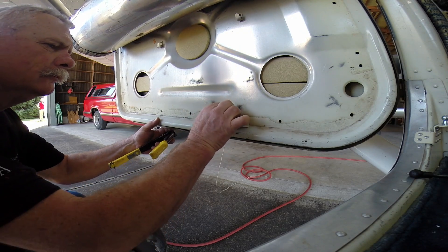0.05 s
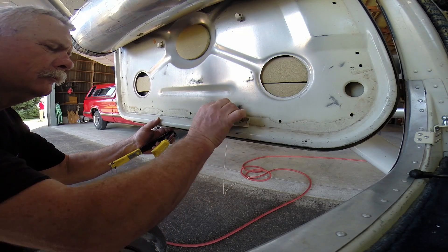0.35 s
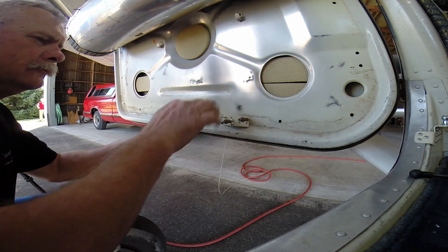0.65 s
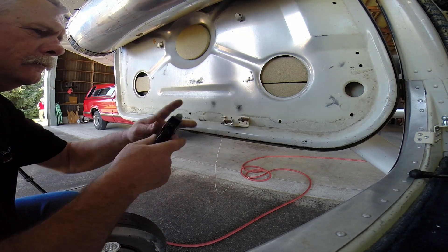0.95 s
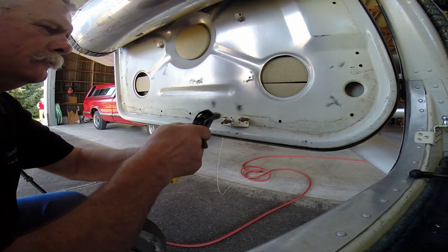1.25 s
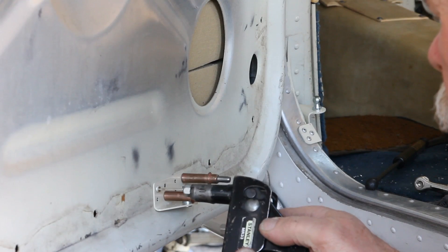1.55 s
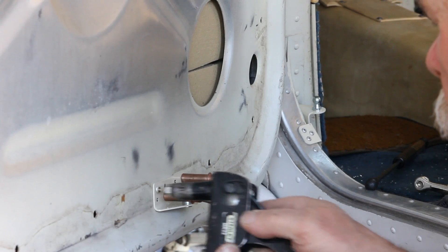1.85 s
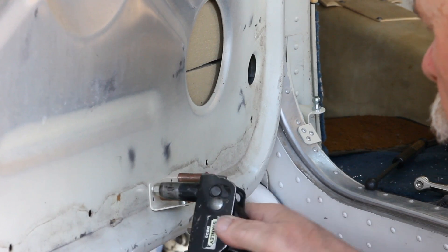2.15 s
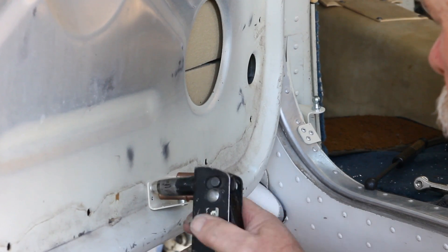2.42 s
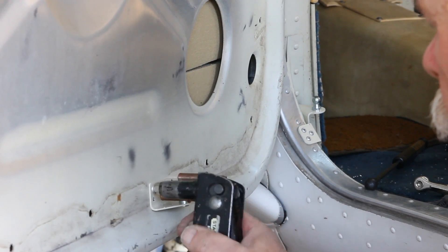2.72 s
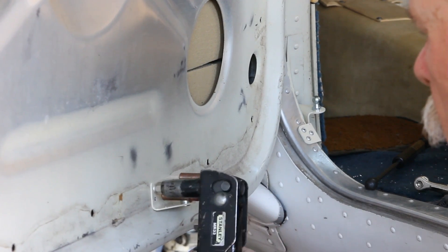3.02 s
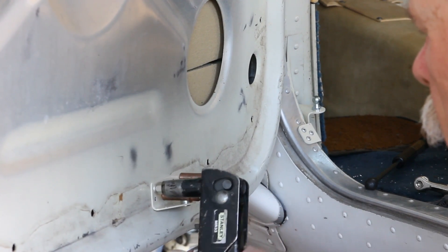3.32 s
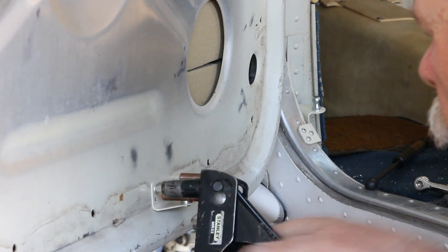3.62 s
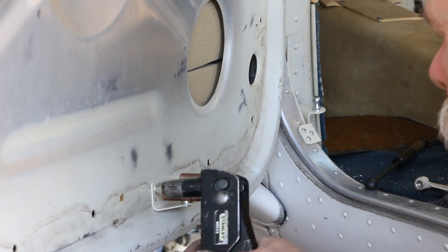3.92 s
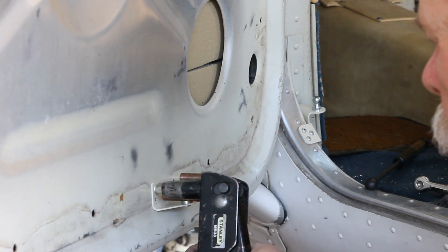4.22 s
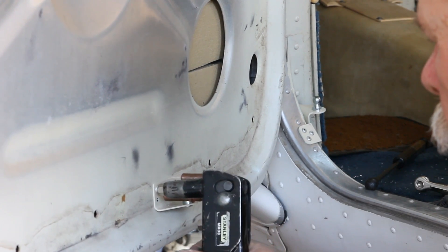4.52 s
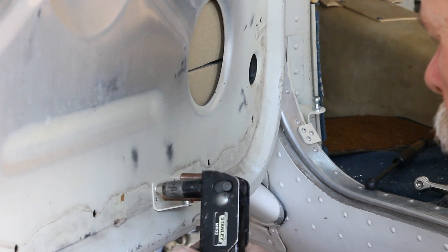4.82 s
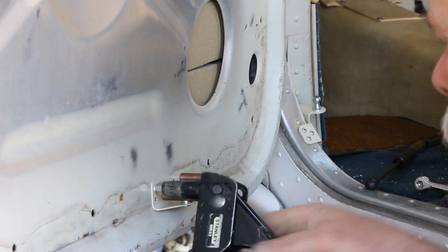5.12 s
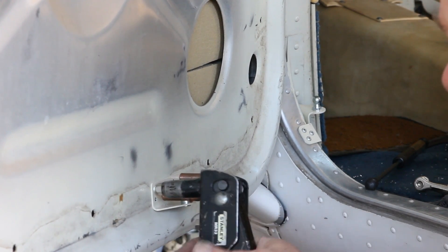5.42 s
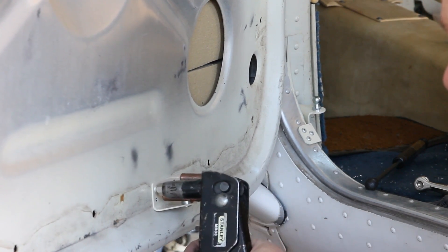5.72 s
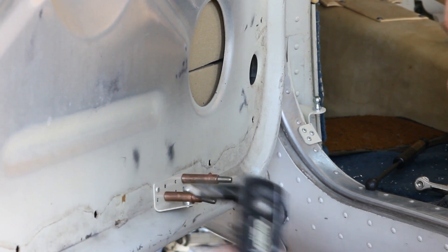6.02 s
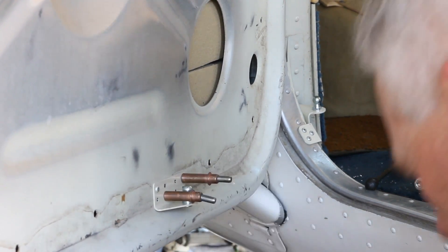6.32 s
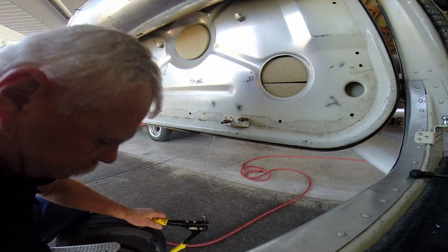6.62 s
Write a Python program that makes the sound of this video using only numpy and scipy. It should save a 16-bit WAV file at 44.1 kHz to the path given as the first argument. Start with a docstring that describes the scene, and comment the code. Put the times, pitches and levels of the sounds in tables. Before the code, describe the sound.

Close up in a quiet garage, a hand riveter taps, scrapes and clunks on a thin, briefly ringing aluminium panel while small steel parts tick. Past the middle the tool snaps with a bang. More knocks lead to a second, harder bang near the end, slightly distorted, followed by a cluster of light metallic clicks and low buffeting on the microphone.

```python
"""Close knocks, clicks and scrapes on a thin aluminium door panel: a hand riveter at work in a garage.
Twice it lets go with a bang, the second hard enough to overload the microphone. Blows are bands of noise
dying away in the sheet over its ringing low modes; sliding metal hisses, catches and squeaks, and small
steel parts tick. Faint whines hang in the air, and a low buffeting rises towards the end."""
import sys
import numpy as np
from scipy import signal
from scipy.io import wavfile

SR = 44100
rng = np.random.default_rng(int(sys.argv[2]) if len(sys.argv) > 2 else 0)


def generate_wav(signal):
    """Clip the signal to [-1, 1] and save it as 16-bit WAV at the path in sys.argv[1]."""
    frames = np.transpose(np.atleast_2d(signal))
    scaled = np.clip(frames, -1, 1) * 32767
    pcm = np.round(scaled).astype(np.int16)
    wavfile.write(sys.argv[1], SR, pcm)


N = 297675
TIME = np.arange(N) / SR
EDGES = np.geomspace(24, 17000, 21)   # half-octave bands, Hz
CENTRES = np.sqrt(EDGES[1:] * EDGES[:-1])

# The riveter lets go. Each row: start in seconds, then level, thump and brightness in relative dB.
BANGS = [(4.5293, -11, -10.5, -2.5), (5.9415, -2, -15.5, -3.5)]
# The tool hits the panel. Each row: start in seconds, then level, thump and brightness in relative dB.
KNOCKS = [(0.085, -45.5, 1, -22), (0.2948, -23, -4, -10), (0.708, -44, -23, -6.5), (1.718, -34, -14, -11),
          (1.804, -31.5, -5.5, -7.5), (2.0163, -20.5, -8.5, -9), (2.055, -38, -5, -0.5),
          (2.201, -39.5, -13, -16), (2.23, -39, -7, -2.5), (2.461, -42.5, -8, -2.5), (2.659, -46, -3, -56),
          (3.027, -34.5, -8, -12.5), (3.228, -36, -20, -15.5), (3.534, -19, -20.5, -6.5),
          (3.574, -13.5, -10.5, -7.5), (3.886, -38, 3.5, -1.5), (3.979, -40, -12, -18.5),
          (4.088, -54, -4, -31), (4.209, -52.5, -5, -38), (4.526, -22.5, -7.5, -20), (5.006, -44, -14, -16),
          (5.072, -34.5, -5.5, 2.5), (5.099, -18.5, -15.5, -7.5), (5.172, -22.5, 0.5, -7.5),
          (5.181, -12.5, -25.5, -6.5), (5.453, -38.5, 2, -7), (5.551, -41.5, -7, -16)]
# Tool and hand slide on metal. Each row: start and end in seconds, level and brightness in relative dB.
RUBS = [(0.405, 0.67, -51, -15.5), (0.899, 1.24, -62, -3.5), (1.481, 1.501, -41.5, -37),
        (1.89, 1.948, -47, -13.5), (1.956, 2.0, -32, -26), (2.004, 2.012, -23.5, -16),
        (2.084, 2.61, -53, -19.5), (2.87, 3.48, -56.5, -18.5), (3.489, 3.634, -30, -14),
        (3.763, 3.872, -39.5, -24), (3.875, 3.924, -39.5, -6), (4.96, 5.05, -48, -18),
        (5.079, 5.149, -27.5, -14.5), (5.375, 5.504, -40.5, -22), (6.17, 6.649, -75, 13.5),
        (6.346, 6.365, -48, 0.5)]
# Modes of the small steel parts. Each row: pitch in Hz, weight in dB.
STEEL_MODES = [(1570, 13.5), (1920, 7.5), (2360, -2.5), (2750, -6), (3580, -8.5), (4190, -7), (5000, -1.5),
               (5800, -4.5), (6650, 2), (7450, 0), (8150, -3), (9560, 0.5), (10400, 1), (11800, 0.5),
               (14100, 2)]


def from_db(db):
    """Decibels to amplitude."""
    return 10 ** (np.asarray(db) / 20)


def rms_one(x):
    """Scales a signal to an rms of 1."""
    return x / np.sqrt(np.mean(x ** 2) + 1e-20)


def at_bands(points):
    """Reads a curve of (Hz, value) points at the band centres, on a log-frequency axis."""
    hz, values = np.transpose(points)
    return np.interp(np.log(CENTRES), np.log(hz), values)


def envelope(start, end, attack_s, release_s):
    """Rises to 1 at the start, holds to the end, then falls away."""
    return np.interp(TIME, [start - attack_s, start, end, end + release_s], [0, 1, 1, 0])


def flutter(rate):
    """A wobble of rms 1 through `rate` random points a second."""
    return rms_one(np.interp(TIME * rate, np.arange(N // 8), rng.standard_normal(N // 8)))


def resonate(x, hz, width_hz):
    """One resonance, gain 1 at its peak."""
    r = np.exp(-np.pi * width_hz / SR)
    poles = [1, -2 * r * np.cos(2 * np.pi * hz / SR), r * r]
    return signal.lfilter(np.array([1, 0, -1]) * (1 - r * r) / 2, poles, x + 1e-18)


def noise_bands():
    """Unrelated half-octave noises of rms 1: the crowd of modes too dense to tell apart."""
    filters = [signal.butter(2, edge, "band", fs=SR, output="sos") for edge in zip(EDGES, EDGES[1:])]
    return np.array([rms_one(signal.sosfilt(sos, rng.standard_normal(N))) for sos in filters])


def band_gains(spectrum):
    """Band amplitudes of a spectrum, with total power 1."""
    gains = from_db(at_bands(spectrum)) * np.sqrt(np.diff(EDGES))
    return gains / np.linalg.norm(gains)


def garage_air(bands, air_db=-59, fade_s=0.12, rest_db=-14):
    """Quiet room tone with faint high whines that swell and recede."""
    # The room tone's colour. Each row: frequency in Hz, density in relative dB.
    air = [(15, -49), (25, -32.5), (97, 6), (277, -4.5), (326, -10), (476, 3.5), (531, -11.5),
           (2050, -25.5), (2350, -27.5), (5000, -32.5), (6920, -32.5), (10700, -32.5), (16000, -32.5)]
    # Narrow bands of whining noise. Each row: pitch in Hz, width in Hz, full level in dB.
    whines = [(2060, 200, -87), (5800, 280, -82), (10760, 410, -78.5)]
    # When the whines are up. Each row: start and end in seconds.
    spells = [(0, 0.33), (2.38, 2.63), (3.75, 4.5), (5.98, 7.3)]
    whine = sum(from_db(db) * rms_one(resonate(resonate(rng.standard_normal(N), hz, width), hz, width))
                for hz, width, db in whines)
    swell = sum(envelope(start, end, fade_s, fade_s) for start, end in spells)
    return from_db(air_db) * (band_gains(air) @ bands) + whine * np.maximum(swell, from_db(rest_db))


def buffeting(bands, attack_s=0.03, release_s=0.025):
    """Lumpy low rumble at the microphone, in overlapping gusts."""
    # The gusts. Each row: start and end in seconds, level in relative dB.
    gusts = [(0.842, 0.851, -48.5), (4.766, 5.039, -54.5), (5.368, 6.729, -45.5), (5.702, 5.739, -34),
             (5.803, 5.839, -37), (5.941, 5.995, -38), (6.257, 6.326, -30), (6.386, 6.394, -33.5),
             (6.432, 6.499, -33.5)]
    power = sum((from_db(db) * envelope(start, end, attack_s, release_s)) ** 2
                for start, end, db in gusts)
    colour = band_gains([(25, -36.5), (55, -12.5), (90, 7), (140, 0.5), (220, -4.5), (400, -16.5),
                         (800, -31), (2000, -55), (16000, -62)])
    return np.sqrt(power) * (colour @ bands)


def tings(shimmer_per_s=130, rise_s=0.025):
    """A thin piece of steel shimmers on faintly after a jolt."""
    # The jolts. Each row: start in seconds, level in relative dB.
    jolts = [(5.945, -51.5), (6.615, -65)]
    # The piece's modes. Each row: pitch in Hz, weight in dB, t60 in seconds.
    modes = [(3230, -2.5, 1), (4500, -5, 0.52)]
    out = np.zeros(N)
    ring = sum(from_db(db - 60 * TIME / t60) * flutter(shimmer_per_s) * np.sin(2 * np.pi * hz * TIME)
               for hz, db, t60 in modes)
    ring *= 1 - np.exp(-TIME / rise_s)
    for s, db in jolts:
        i = int(s * SR)
        out[i:] += from_db(db) * ring[:N - i]
    return out


def squeaks(waver, rough_db, overtone_db):
    """A dry joint sings briefly and roughly, sliding in pitch."""
    # The squeaks. Each row: start and length in seconds, first and last pitch in Hz, level in relative dB.
    glides = [(0.405, 0.15, 2065, 2000, -68.5), (0.931, 0.074, 1660, 1545, -62),
              (1.085, 0.019, 1350, 1280, -54), (1.955, 0.082, 1880, 1803, -42.5),
              (3.685, 0.04, 1690, 1980, -42.5), (6.43, 0.018, 1420, 1630, -42.5)]
    out, wobble = np.zeros(N), 1 + waver * flutter(600)
    for start, length, start_hz, end_hz, db in glides:
        i, n = int(start * SR), int(length * SR)
        phase = 2 * np.pi * np.cumsum(np.linspace(start_hz, end_hz, n) * wobble[i:i + n]) / SR
        tone = np.sin(phase) + from_db(overtone_db) * np.sin(2 * phase)
        out[i:i + n] += from_db(db) * np.sin(np.linspace(0, np.pi, n)) * tone
    return out * rms_one(from_db(rough_db * flutter(450)))


def grit(per_s, spread_db, width_hz):
    """While metal slides, tiny catches tick at random in the steel's modes."""
    level = np.zeros(N)
    for start, end, db, bright_db in RUBS:
        level[int(start * SR):int(end * SR)] = from_db(db + bright_db / 2)
    catches = level * (rng.random(N) < per_s / SR)
    catches *= from_db(spread_db * np.minimum(rng.exponential(1, N), 2))
    rings = sum(from_db(db) * resonate(catches * (2 * rng.random(N) - 1), hz, width_hz)
                for hz, db in STEEL_MODES)
    return rings * SR / (np.pi * width_hz)   # makes up the height an impulse loses in a narrow resonance


def clink(centre_hz, t60, t, scatter_db=5, detune=0.05):
    """One touch of steel: the modes near its pitch ring, each grip tuning and weighting them anew."""
    hz, db = np.transpose(STEEL_MODES)
    strength, shift = rng.standard_normal((2, len(hz)))
    nearness = np.exp(-0.5 * np.log2(hz / centre_hz) ** 2)
    weights = from_db(db + scatter_db * strength) * nearness * rng.choice([-1, 1], len(hz))
    rings = np.sin(2 * np.pi * (hz * (1 + detune * shift))[:, None] * t)
    return weights / np.linalg.norm(weights) @ rings * from_db(-60 * t / t60)


def loose_ticks(per_s=12, centre_hz=5260, octaves=0.65, spread_db=5):
    """Loose parts touch at random while the tool is handled: extra rows for ticks()."""
    # Spells of handling. Each row: start and end in seconds, level in relative dB.
    handling = [(0.903, 1.228, -50), (2.304, 3.457, -64), (4.927, 5.49, -46.5), (6.196, 6.57, -61)]
    return [(rng.uniform(start, end), db + spread_db * rng.standard_normal(),
             centre_hz * 2 ** (octaves * rng.standard_normal()))
            for start, end, db in handling for _ in range(int(per_s * (end - start)))]


def ticks(bands, t60, ring_t60, octaves, modes_db, bounce_db, body_db):
    """Light steel contacts: a crack, a clink at the part's own pitch, and one quick bounce."""
    # Small parts touching. Each row: start in seconds, level in relative dB, centre pitch in Hz.
    contacts = [(0.949, -52.5, 3700), (0.977, -35.5, 4460), (0.991, -43, 3280), (1.076, -55, 3300),
                (1.122, -53, 3500), (1.171, -42, 2740), (2.346, -40, 4040), (2.495, -40.5, 3950),
                (2.545, -48, 11500), (2.773, -55, 1900), (2.885, -49.5, 6030), (2.986, -41.5, 5770),
                (3.1131, -40.5, 7740), (3.146, -52, 7040), (3.477, -33.5, 6350), (3.489, -45, 6000),
                (3.501, -41, 7500), (3.776, -44, 3000), (3.803, -38, 5960), (3.823, -34, 5600),
                (3.890, -37, 6070), (4.579, -32.5, 8000), (4.766, -44.5, 7100), (5.041, -43, 5940),
                (5.064, -40.5, 5140), (5.139, -33, 5500), (5.214, -38, 7900), (5.351, -53, 6500),
                (5.371, -37, 4960), (5.379, -26, 5370), (5.392, -43, 8500), (5.428, -48, 5900),
                (5.468, -43, 8000), (5.483, -36.5, 7700), (6.139, -35, 6240), (6.209, -26.5, 6900),
                (6.222, -35, 7500), (6.2315, -25.5, 7800), (6.243, -34, 7300), (6.319, -32, 7700),
                (6.355, -33, 5300), (6.368, -30.5, 6700), (6.379, -26.5, 8500), (6.4893, -40.5, 7650),
                (6.631, -50, 8600)]
    out, t = np.zeros(N), TIME[:SR // 10]
    snap = from_db(-60 * t / t60) * (1 - np.exp(-t / 0.00083))
    for s, db, hz in contacts + loose_ticks():
        colour = np.exp(-0.5 * (np.log2(CENTRES / hz) / octaves) ** 2)
        colour += from_db(body_db) * (CENTRES > 350)
        for delay, touch_db in [(0, 0), (rng.uniform(0.0028, 0.007), bounce_db)]:
            i = int((s + delay) * SR)
            crack = snap * (colour / np.linalg.norm(colour) @ bands[:, i:i + len(t)])
            ring = from_db(modes_db) * clink(hz, ring_t60, t)
            out[i:i + len(t)] += from_db(db + touch_db) * (crack + ring)
    return out


def contact_colour(thump_db, bright_db):
    """Band gains of a contact with the panel: a heavy one adds bass, a hard one treble."""
    # The basic colour of a blow. Each row: frequency in Hz, density in relative dB.
    spectrum = [(30, -12), (70, 1), (130, 5.5), (220, 3), (330, 4), (500, 7), (900, 0), (1500, -7.5),
                (2500, -7), (3800, -7), (5800, -2.5), (9000, -7.5), (15500, -13.5)]
    tilt = [(35, -6.5), (90, thump_db + 6.5), (200, thump_db + 5.5), (420, 0), (1500, -0.5),
            (4200, bright_db + 0.5)]
    return band_gains(spectrum) * from_db(at_bands(tilt))


def rubs(bands, edge_s, thump_db, slip_db, grit_db):
    """Sliding metal sticks and slips, so each stroke is an uneven, gritty hiss."""
    out = np.zeros(N)
    for start, end, db, bright_db in RUBS:
        i, j = int((start - edge_s) * SR), int((end + 2 * edge_s) * SR)
        stroke = envelope(start, end, edge_s, 2 * edge_s)[i:j]
        out[i:j] += from_db(db) * stroke * (contact_colour(thump_db, bright_db) @ bands[:, i:j])
    return out * rms_one(from_db(slip_db * flutter(55) + grit_db * flutter(700)))


def lever(scrape):
    """A scrape picks up the ring of the riveter's steel lever."""
    # The lever's resonances. Each row: pitch in Hz, width in Hz, gain in dB.
    modes = [(1784, 44, 6), (2820, 130, 3), (4400, 480, 2.5)]
    return scrape + sum(from_db(db) * resonate(scrape, hz, width) for hz, width, db in modes)


def tool_ring(centre_hz, t60):
    """The riveter's own steel rings with every knock, the more the harder the contact."""
    out, t = np.zeros(N), TIME[:SR // 5]
    for s, db, thump_db, bright_db in KNOCKS:
        i = int(s * SR)
        out[i:i + len(t)] += from_db(db + bright_db) * clink(centre_hz, t60, t)
    return out


def pressed():
    """1 while the tool is squeezed hard against the panel, fading to 0 either side."""
    # The squeezes. Each row: start and end in seconds.
    squeezes = [(1.96, 2.07), (3.49, 3.76), (4.52, 4.73), (5.08, 5.24)]
    return sum(envelope(start, end, 0.01, 0.01) for start, end in squeezes)


def panel(contacts, engaged_s=1.6, unloaded_db=-8.5, shifts_per_s=6, shift_db=2):
    """The sheet's modes ring out more once the riveter bears on it; a hard squeeze tames the strongest."""
    # The sheet's resonances. Each row: pitch in Hz, width in Hz, nominal gain in dB.
    modes = [(254, 22, -7), (383, 20, -2), (483, 22, 10.5), (555, 18, -2), (719, 20, -7), (776, 22, 2.5),
             (929, 20, -6), (1006, 30, -2), (1124, 34, -6), (1290, 40, 0), (1600, 40, -2), (1835, 32, -2),
             (1941, 30, -5), (5310, 55, -2), (8560, 55, -2)]
    drive = contacts * np.where(TIME < engaged_s, from_db(unloaded_db), 1)
    ring, held = np.zeros(N), pressed()
    for hz, width, db in modes:
        drift_db = shift_db * flutter(shifts_per_s)   # the point of contact shifts
        ring += resonate(drive * from_db(db - held * max(0, db) + drift_db), hz, width)
    return contacts + ring


def body_ring(hits, modes, per_thump=0.27, rise_s=0.0016, detune=0.0095):
    """Blows set the body's modes swinging, retuned by each grip; dull ones barely reach the high modes."""
    out, t = np.zeros(N), TIME[:SR // 3]
    hz, mode_db, t60 = np.transpose(modes)[:, :, None]
    attack = 1 - np.exp(-t / rise_s)
    for s, db, thump_db, bright_db in hits:
        i, shift = int(s * SR), 1 + detune * rng.standard_normal(hz.shape)
        decay = from_db(mode_db + bright_db * (hz > 4000) - 60 * t / t60)
        rings = rng.choice([-1, 1], hz.shape) * decay * np.sin(2 * np.pi * hz * shift * t)
        out[i:i + len(t)] += from_db(db + per_thump * thump_db) * attack * rings.sum(0)
    return out


def clunks():
    """Knocks during a squeeze are solid clunks; other knocks and the bangs let the sheet swing freely."""
    # Tool and panel as one body. Each row: pitch in Hz, weight in dB, t60 in seconds.
    solid_modes = [(109, -14.5, 0.22), (256.5, -9.5, 0.22), (380, -12.5, 0.19), (434, -5, 0.2),
                   (553.7, -6.5, 0.19), (683, -7.5, 0.029), (782, -5, 0.11)]
    # The free sheet, hollow with a brief top ring. Each row: pitch in Hz, weight in dB, t60 in seconds.
    free_modes = [(279.8, -14.5, 0.25), (473, -3, .15), (779, -5.5, 0.1), (956, -7, 0.077),
                  (5500, -12, 0.061)]
    held = pressed()
    solid = [row for row in KNOCKS if held[int(row[0] * SR)]]
    free = [row for row in KNOCKS if row not in solid]
    return from_db(1.5) * body_ring(solid, solid_modes) + body_ring(BANGS + free, free_modes)


def blows(hits, bands, ring_scale, longer_per_thump, longer_per_level, rise_s, build_s, hold_s,
          tail_db, rattle_db, bark_db, crack_db, ordinary_db=-21, top_per_db=0.41):
    """Each blow cracks, spreads through the sheet treble first, dies away and leaves a garage tail."""
    # The sheet's decay before each blow scales it. Each row: frequency in Hz, t60 in seconds.
    sheet_t60 = [(50, 0.063), (250, 0.3), (500, 0.16), (1200, 0.17), (3000, 0.12), (7000, 0.1),
                 (15000, 0.15)]
    # The colour of the garage's tail. Each row: frequency in Hz, level in relative dB.
    garage_colour = [(50, -6), (300, -20.5), (1000, -22.5), (3000, -25.5), (5800, -20), (8000, -23.5),
                     (15000, -36)]
    # The garage's decay. Each row: frequency in Hz, t60 in seconds.
    garage_t60 = [(50, 0.9), (500, 0.66), (3000, 0.64), (6000, 0.31), (15000, 0.39)]
    out, t, near = np.zeros(N), TIME[:SR * 2 // 3], SR // 4
    slowness = np.minimum(1, 900 / CENTRES)[:, None] ** 0.5   # low bending waves travel slowly
    swell = 1 - np.exp(-t[:near] / (rise_s + build_s * slowness ** 2))
    crack = 1 + from_db(crack_db) * np.exp(-t[:near] / 0.0047)
    tail = from_db(tail_db + at_bands(garage_colour)[:, None] - 60 * t / at_bands(garage_t60)[:, None])
    tail *= 1 - np.exp(-t / 0.0078)
    free_s = np.maximum(0, t[:near] - hold_s * slowness)   # the sheet rings freely once the tool lets go
    fall = -np.log(1000) * free_s / at_bands(sheet_t60)[:, None]
    rattle = from_db(rattle_db * flutter(450))   # the loose tool chatters on the sheet
    for s, db, thump_db, bright_db in hits:
        i, force_db = int(s * SR), db - ordinary_db
        # Heavy, hard blows ring longer; hard ones also reach further into the top octave.
        stretch = ring_scale * np.exp(longer_per_thump * thump_db + longer_per_level * force_db)
        bark = [(550, 0.0049), (1000, bark_db), (2200, bark_db), (4000, 0), (7000, 0.0066),
                (14000, top_per_db * force_db)]
        colour = from_db(at_bands(bark)) * contact_colour(thump_db, bright_db)
        direct = np.exp(fall / stretch) * swell * crack * rattle[i:i + near]
        shape = tail.copy()
        shape[:, :near] = np.hypot(direct, tail[:, :near])
        out[i:i + len(t)] += from_db(db) * colour @ (shape * bands[:, i:i + len(t)])
    return out


def scene():
    """Bangs, knocks, rubs and ticks sound through the panel; the other layers come directly."""
    struck, sliding = noise_bands(), noise_bands()
    bangs = blows(BANGS, struck, ring_scale=0.42, longer_per_thump=0, longer_per_level=0.018,
                  rise_s=0.0031, build_s=0.0038, hold_s=0.014,
                  tail_db=0, rattle_db=-3.5, bark_db=6.5, crack_db=-1)
    knocks = blows(KNOCKS, struck, ring_scale=0.98, longer_per_thump=0.026, longer_per_level=0.0048,
                   rise_s=0.0026, build_s=0.0019, hold_s=0.00083,
                   tail_db=-7, rattle_db=0.5, bark_db=1.4, crack_db=-5.5)
    rubbing = lever(rubs(sliding, edge_s=0.02, thump_db=-10.5, slip_db=3.5, grit_db=0.5))
    clicks = ticks(sliding, t60=0.014, ring_t60=0.032, octaves=0.56,
                   modes_db=-1.5, bounce_db=-12, body_db=-17.5)
    contacts = bangs + from_db(1.5) * knocks + from_db(-3.5) * rubbing + from_db(1) * clicks
    sheet = panel(contacts) + clunks()
    steel = from_db(6.5) * tings() + from_db(-1) * tool_ring(centre_hz=3640, t60=0.11)
    catches = from_db(-9) * grit(per_s=45, spread_db=3, width_hz=190)
    squeal = from_db(3) * squeaks(waver=0.022, rough_db=3.2, overtone_db=-24)
    bed = from_db(2.5) * buffeting(sliding) + garage_air(struck[:, ::-1])
    return (sheet + steel + catches + squeal + bed)[None]


def record(dry, ceiling=0.48, low_cut_hz=36, high_cut_hz=15950):
    """The microphone drops the deep bass and overloads on the loudest peaks; the top is cut steeply."""
    heard = signal.sosfilt(signal.butter(2, low_cut_hz, "high", fs=SR, output="sos"), dry)
    clipped = heard / (1 + (heard / ceiling) ** 6) ** (1 / 6)
    high_cut = signal.firwin(161, high_cut_hz, window=("kaiser", 8), fs=SR)
    return signal.fftconvolve(clipped, high_cut[None], mode="same")


dry = scene()
out = record(dry)
generate_wav(out)
```